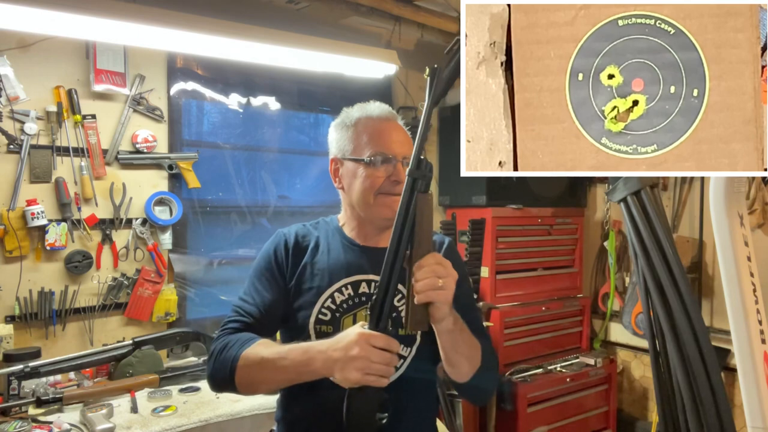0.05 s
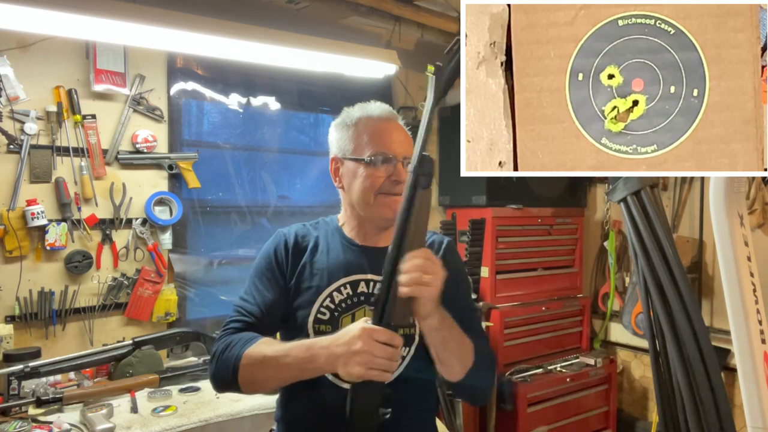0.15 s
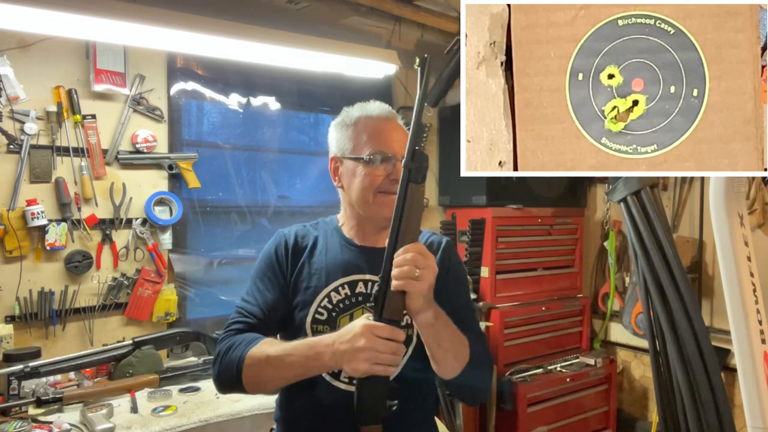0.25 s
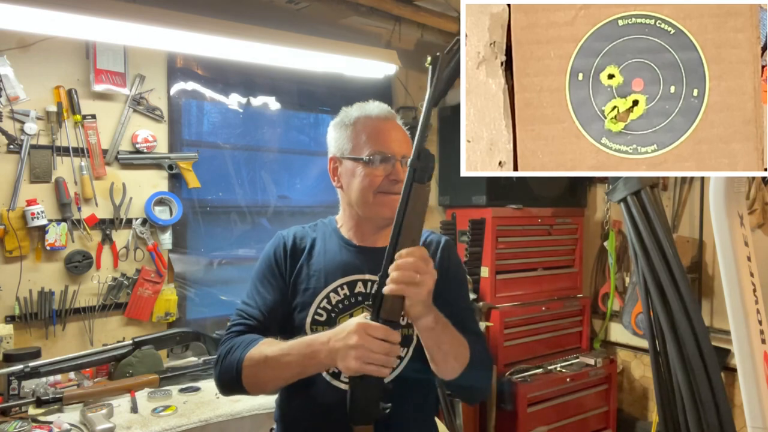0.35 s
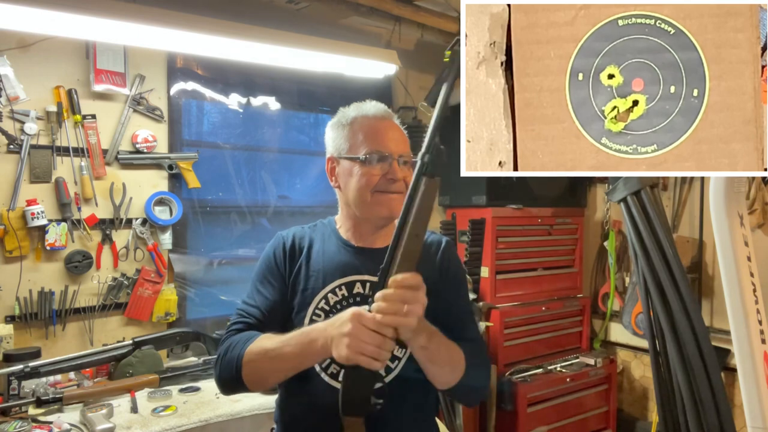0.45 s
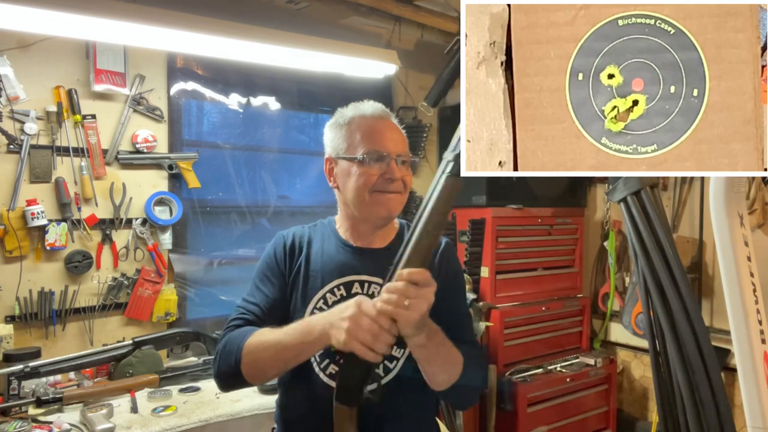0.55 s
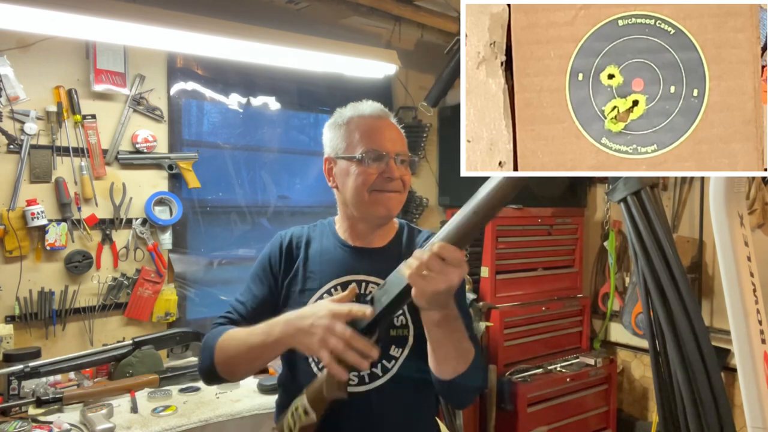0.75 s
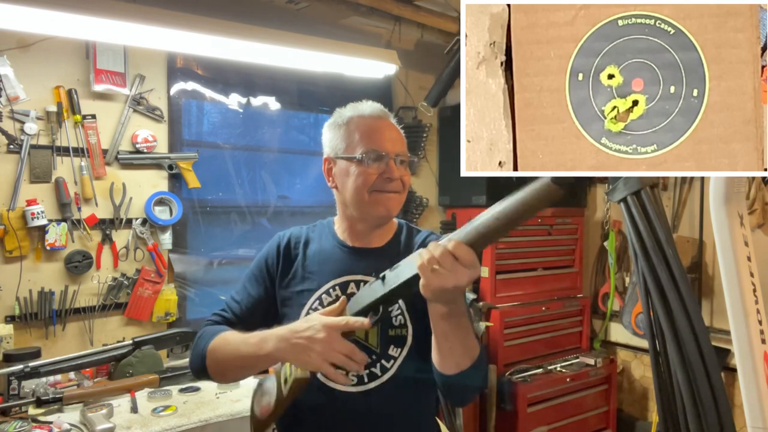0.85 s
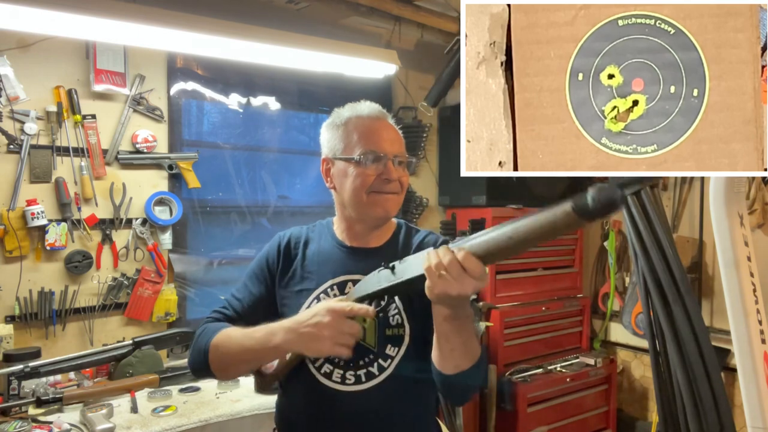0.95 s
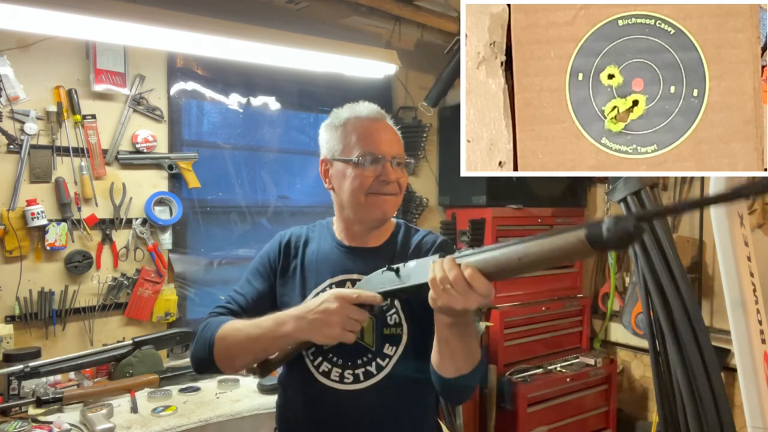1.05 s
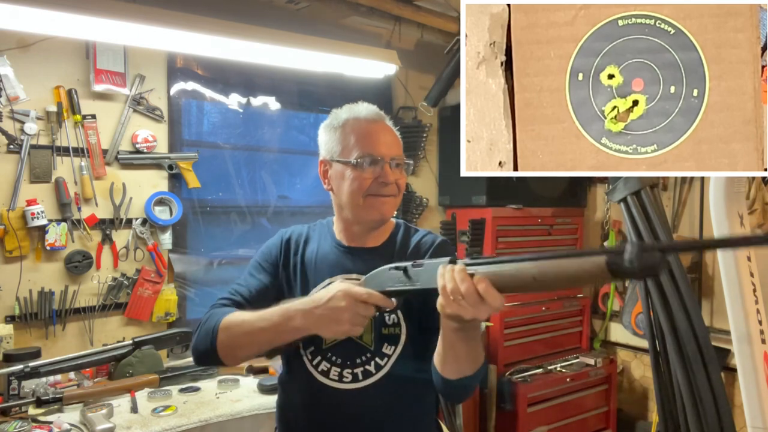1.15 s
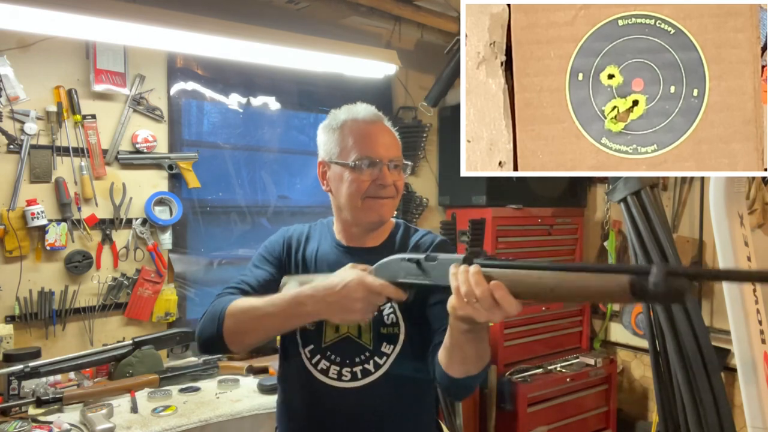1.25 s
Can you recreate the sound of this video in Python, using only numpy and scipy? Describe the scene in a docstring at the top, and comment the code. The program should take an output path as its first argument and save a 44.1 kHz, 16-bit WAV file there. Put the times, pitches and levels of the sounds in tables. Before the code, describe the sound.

Close to the microphone in a garage, an air rifle's pump lever snaps closed with a sharp, briefly ringing crack. The action then clicks, sleeves rustle faintly and a hand softly knocks the stock over quiet room air.

```python
"""An air rifle's pump lever slams shut, close up in a small garage.
It touches, scrapes home and hits the barrel tube: a crack, a wooden thock, a metal ring and a puff
of air that overloads the microphone. The room rings on. Then the action clicks, sleeves rustle as
the rifle is raised, and a hand knocks on the stock, all over faint room air and a deep rumble."""
import sys
import numpy as np
from scipy import signal
from scipy.fft import rfft, irfft
from scipy.io import wavfile

SR = 44100
rng = np.random.default_rng(int(sys.argv[2]) if len(sys.argv) > 2 else 0)


def put_to_file(sound):
    """Save the sound as 16-bit audio at rate SR, in the file named by the first command-line argument."""
    columns = np.atleast_2d(sound).T  # one column per channel
    safe = np.clip(columns, -1, 1)
    whole_steps = np.round(safe * 32767)
    wavfile.write(sys.argv[1], SR, whole_steps.astype(np.int16))


N = 57330
T = np.arange(N) / SR


def from_db(db):
    """Decibels to gain."""
    return 10 ** (np.asarray(db) / 20)


def unit_rms(x):
    """Scale to rms 1."""
    return x / np.sqrt(np.mean(x ** 2) + 1e-20)


def at_hz(points, hz):
    """Read a curve on a log-frequency axis."""
    freqs, values = np.transpose(points)
    return np.interp(np.log(np.maximum(hz, 1)), np.log(freqs), values)


def tinted(x, spectrum):
    """EQ a signal and scale it to rms 1."""
    gain = from_db(at_hz(spectrum, np.fft.rfftfreq(N, 1 / SR)))
    return unit_rms(irfft(rfft(x) * gain, N))


def noise(spectrum):
    """Steady coloured noise, rms 1."""
    return tinted(rng.standard_normal(N), spectrum)


def fader(points):
    """Gain that rides through (time [s], level [dB]) points."""
    return from_db(np.interp(T, *np.transpose(points)))


def fade(t60):
    """Exponential decay, 60 dB down after t60 seconds."""
    return from_db(-60 * T / t60)


def delayed(x, start_s):
    """Cue a sound at start_s."""
    return np.concatenate([np.zeros(int(start_s * SR)), x])[:N]


def ringing(modes):
    """A struck body's modes: decaying sines of alternating sign."""
    return sum((-1) ** k * from_db(db) * fade(t60) * np.sin(2 * np.pi * hz * T)
               for k, (hz, db, t60) in enumerate(modes))


def damped(modes, cycles):
    """Modes that all fall 60 dB in the same number of cycles, so the high ones die first."""
    return ringing([(hz, db, cycles / hz) for hz, db in modes])


def crack(spectrum, decay_s):
    """A dying burst of micro-contacts, evened out so that it has no chance pitch."""
    envelope = fade(decay_s)
    burst = rng.standard_normal(N) * envelope
    for _ in range(6):
        flat = irfft(np.exp(1j * np.angle(rfft(burst))), N)
        burst = tinted(flat, spectrum) * np.exp(-(T / decay_s) ** 2)   # the window keeps it short
    return unit_rms(burst) * np.sqrt(np.mean(envelope ** 2))


def filtered(x, hz, kind="low", order=2):
    """Butterworth roll-off, low-pass by default."""
    return signal.sosfilt(signal.butter(order, hz, kind, fs=SR, output="sos"), x)


def strikes(hits, ring, crack_spectrum, crack_db, decay_s):
    """Each contact is a fresh crack plus the part's ring, with its own level and brightness."""
    track = np.zeros(N)
    for start_s, db, lowpass_hz in hits:
        contact = ring + from_db(crack_db) * crack(crack_spectrum, decay_s)
        track += delayed(from_db(db) * filtered(contact, lowpass_hz), start_s)
    return track


# Room tone EQ: (frequency [Hz], level [dB])
AIR_EQ = [(40, -9.5), (75, -13), (140, -9), (240, -18), (400, -17.5), (470, -20), (520, -10), (600, -19),
          (1050, -20.5), (1900, -28), (4000, -36.5), (8000, -43.5), (13000, -44)]
# Rumble EQ: (frequency [Hz], level [dB])
RUMBLE_EQ = [(10, 13.5), (25, -3), (50, -2), (80, -14.5), (140, -16), (300, -51.5), (1000, -92.5)]
# Rumble fader: (time [s], level [dB])
RUMBLE_FADER = [(0, -49), (.2, -34), (.28, -41.5), (.5, -39.5), (.7, -41.5), (1.3, -50)]

def room_tone():
    """A bed of faint, steady air over a deep rumble that swells with the slam."""
    return from_db(-54.5) * noise(AIR_EQ) + fader(RUMBLE_FADER) * noise(RUMBLE_EQ)


# Reverb decay: (frequency [Hz], t60 [s])
REVERB_DECAY = [(150, 0.54), (400, 0.5), (900, 0.3377), (2000, 0.3247), (5000, 0.2717), (13000, 0.2364)]
# Reverb EQ: (frequency [Hz], level [dB])
REVERB_EQ = [(100, -9.5), (300, -19), (450, -2.5), (620, -6), (900, -4), (1400, 0.5), (1900, -4),
             (2400, 1.5), (3400, 1.5), (4800, -1), (6500, 3), (9000, -3), (13000, 0)]
# Early reflections off the walls: (delay [s], level [dB])
WALL_ECHOES = [(.0095, -11), (0.0157, -17), (0.0289, -11.5)]
# Standing waves between the walls: (frequency [Hz], relative level [dB])
STANDING_WAVES = [(456, 4.5), (486, -3), (716, 4), (790, 2), (940, -2), (1016, -5), (1072, -1.5),
                  (1310, -3), (1400, -5), (1450, -4.5), (2031, -4.5), (2325, -2), (2410, 0.5), (2444, -2),
                  (3077, -0.5), (3160, 0), (3832, -1.5)]

def garage():
    """The room's impulse response: a diffuse tail dying band by band, echoes and standing waves."""
    white = rfft(rng.standard_normal(N))
    freqs = np.fft.rfftfreq(N, 1 / SR)
    edges_hz = np.geomspace(60, 20000, 22)
    tail = np.zeros(N)
    for low, high in zip(edges_hz, edges_hz[1:]):
        centre = np.sqrt(low * high)
        band = irfft(white * (freqs >= low) * (freqs < high), N)
        tail += band * from_db(at_hz(REVERB_EQ, centre)) * fade(at_hz(REVERB_DECAY, centre))
    tail *= 1 - np.exp(-T / .0013)   # 1.3 ms build-up
    tail /= np.sqrt(np.sum(tail ** 2))
    for delay_s, db in WALL_ECHOES:
        tail[int(delay_s * SR)] += from_db(db)
    standing = ringing([(hz, db, .23) for hz, db in STANDING_WAVES])   # t60 of 0.23 s
    return tail + from_db(-53) * standing


# Cloth fader: (time [s], level [dB])
CLOTH_FADER = [(0, -67), (.16, -65), (.42, -61.5), (.48, -58), (.54, -59.5), (.78, -74), (.885, -73.5),
               (.92, -58.5), (.99, -64), (1.06, -57.5), (1.14, -67.5), (1.2, -57), (1.25, -63.5),
               (1.3, -63)]
# Cloth EQ: (frequency [Hz], level [dB])
CLOTH_EQ = [(400, 2.5), (1100, 5.5), (2000, -3.5), (3200, 2.5), (4500, 2), (5500, -3.5), (6800, 2.5),
            (10500, -8.5), (13000, -7.5)]

def sleeves(grains_per_s=900, grain_gain=.4):
    """Cloth slides: a fine hiss, made grainy by tiny catches of the fibres."""
    catches = rng.random(N) < grains_per_s / SR
    grains = unit_rms(catches * rng.standard_normal(N))
    hiss = rng.standard_normal(N)
    return fader(CLOTH_FADER) * tinted(hiss + grain_gain * grains, CLOTH_EQ)


# Body of the stock: (frequency [Hz], relative level [dB], t60 [s])
STOCK_BODY = [(320, -8.5, .05), (445, -0.5, 0.07), (711, -11.5, 0.054), (1060, -8.5, 0.052),
              (1358, -6, 0.034), (1713, -3.5, 0.021), (2800, -3, 0.013), (4010, -10, 0.015),
              (4650, -9, 0.016)]
# Attack EQ of the knock: (frequency [Hz], level [dB])
KNOCK_EQ = [(300, 5), (1500, -10), (4500, -8), (7000, -14), (13000, -28)]

def stock_knock(start_s=1.2802):
    """A hand grips the rifle and knocks a dull, short note out of the stock."""
    knock = ringing(STOCK_BODY) + from_db(-6.5) * crack(KNOCK_EQ, decay_s=.014)
    return delayed(from_db(-33.5) * knock, start_s)


# Click cues: (time [s], level [dB], low-pass [Hz])
ACTION_CLICKS = [(0.5414, -27.5, 2000), (0.5629, -45.5, 6020), (0.5741, -11, 17930), (0.5755, -12.5, 3970),
                 (0.5795, -16.5, 1800), (0.6834, -36.5, 1390)]
# Body of the action: (frequency [Hz], level [dB])
ACTION_BODY = [(930, -12), (1270, -8), (1560, -13), (2400, -13), (3220, -11), (3900, -15), (6700, -12),
               (8800, -10)]
# Its lingering ring: (frequency [Hz], relative level [dB], t60 [s])
ACTION_TAIL = [(857, 0, .13), (1230, -1, .12), (1560, -10, .1)]
# Attack EQ of a click: (frequency [Hz], level [dB])
CLICK_EQ = [(150, -26), (380, -6), (650, -5), (1200, 16), (1950, -8.5), (2600, 4.5), (3900, 0.5),
            (5500, -6.5), (7600, -3), (11000, -1), (13500, -4.5)]

def action_clicks():
    """Small metal parts snap into place; they radiate no bass."""
    ring = damped(ACTION_BODY, cycles=22) + from_db(-21.5) * ringing(ACTION_TAIL)
    clicks = strikes(ACTION_CLICKS, ring, CLICK_EQ, crack_db=2.5, decay_s=.0075)
    return filtered(clicks, hz=267, kind="high")


# Bell-shaped pressure pulses: (time [s], width [s], pressure [re full scale])
AIR_PULSES = [(0.2084, 0.0049, 0.2), (.2123, 0.0025, -0.86), (0.224, .0022, -.2), (0.2346, 0.0022, 0.14),
              (0.287, 0.019, .03), (0.389, 0.1, 0.0235)]

def air_puff():
    """Air squeezed out under the lever pushes on the microphone: a low thump."""
    return sum(pressure * np.exp(-.5 * ((T - peak_s) / width_s) ** 2)
               for peak_s, width_s, pressure in AIR_PULSES)


# The lever meets the barrel tube: (time [s], level [dB], low-pass [Hz])
LEVER_CONTACTS = [(0.1954, -15, 5000), (0.2066, 8.5, 17670), (0.2094, 4, 5018), (0.2160, -11.5, 6000),
                  (0.2220, -9, 6000)]
# Thock of the wooden forearm: (frequency [Hz], level [dB])
FOREARM_THOCK = [(520, -16), (985, -3), (1130, -7), (1400, -10), (2020, -9)]
# Ring of lever and tube: (frequency [Hz], relative level [dB], t60 [s])
LEVER_RING = [(482, -8, .06), (787, -4, .06), (960, -1, .06), (1015, 0, .06), (1450, -3, .06),
              (2320, -9, .07), (3148, -8, .09), (3484, -11, .09), (3832, -6, .11), (3980, -9, .08),
              (4117, -11, .1), (4974, -12, .09)]
# Attack EQ of the slam: (frequency [Hz], level [dB])
SLAM_EQ = [(100, -12), (250, -12.5), (550, -5), (1100, 0.5), (1800, -4), (2800, -4), (4200, -4),
           (7500, -10.5), (13000, -13)]
# Scrape EQ: (frequency [Hz], level [dB])
SCRAPE_EQ = [(300, -19), (2000, -8), (4500, -2), (8000, -2.5), (13000, -4.5)]

def lever_slam(scrape_start_s=.2034, scrape_length_s=.005):
    """The lever touches the tube, scrapes briefly, then slams home and rebounds."""
    ring = damped(FOREARM_THOCK, cycles=12) + from_db(-19) * ringing(LEVER_RING)
    hits = strikes(LEVER_CONTACTS, ring, SLAM_EQ, crack_db=4, decay_s=.015)
    scrape = from_db(-9) * noise(SCRAPE_EQ) * (T < scrape_length_s)
    return hits + delayed(scrape, scrape_start_s)


def scene():
    """Mono mix: the rifle's parts feed the garage reverb; puff, cloth and room tone stay dry."""
    # (track, reverb send [dB])
    parts = [(lever_slam(), -12), (action_clicks(), -14.5), (stock_knock(), -6.5)]
    direct = sum(track for track, _ in parts)
    send = sum(track * from_db(send_db) for track, send_db in parts)
    reverb = signal.fftconvolve(send, garage())[:N]
    return (direct + reverb + air_puff() + sleeves() + room_tone())[None]


def record(dry):
    """The microphone rolls off the highs, the slam clips flat, and a steep filter cuts the top."""
    rolled_off = filtered(dry, hz=14200, order=14)
    clipped = np.clip(rolled_off, -1, 1)
    high_cut = signal.ellip(8, .1, 60, 15450, fs=SR, output="sos")
    return signal.sosfilt(high_cut, clipped)


dry = scene()
out = record(dry)
put_to_file(out)
```